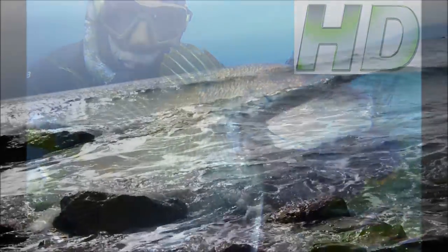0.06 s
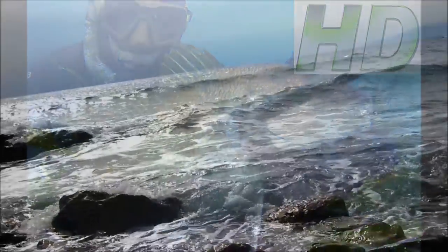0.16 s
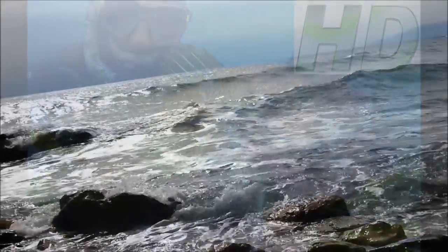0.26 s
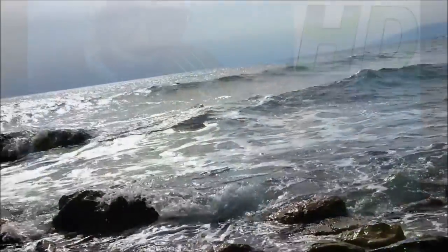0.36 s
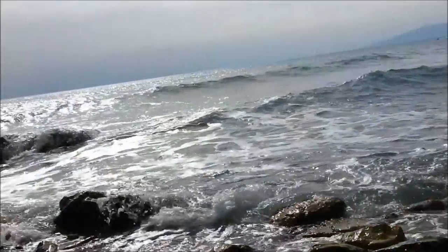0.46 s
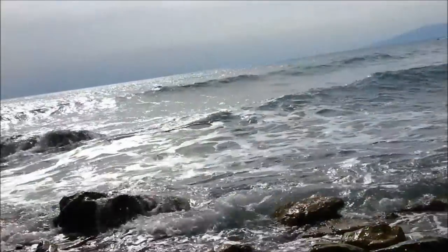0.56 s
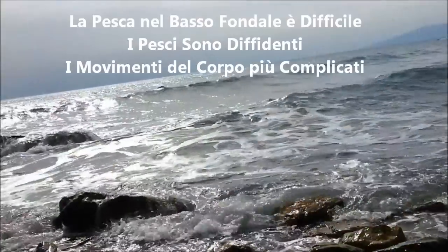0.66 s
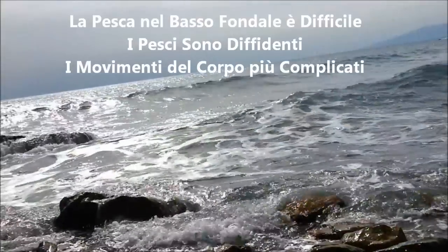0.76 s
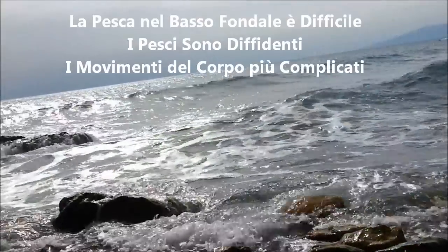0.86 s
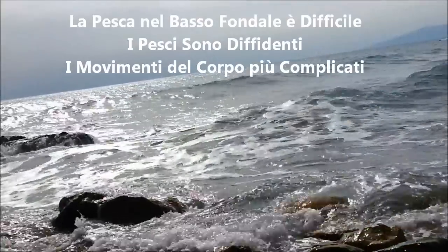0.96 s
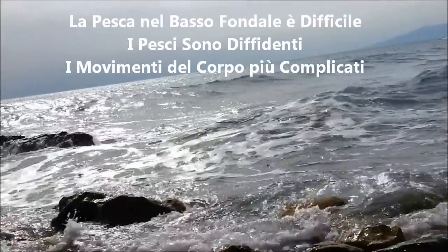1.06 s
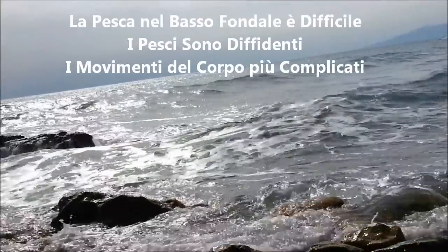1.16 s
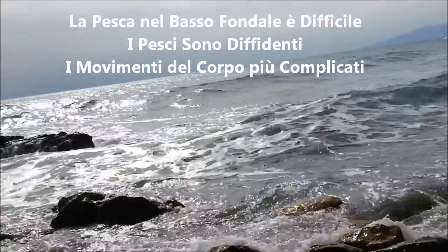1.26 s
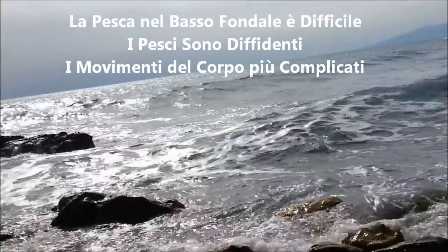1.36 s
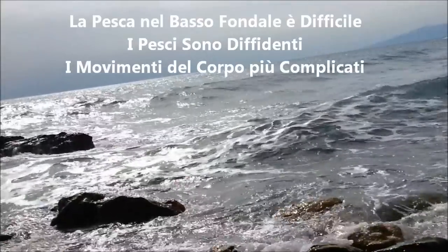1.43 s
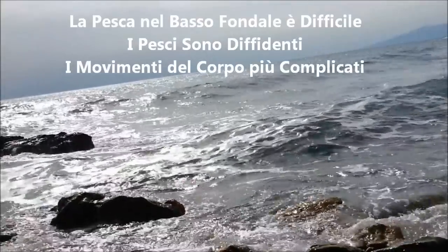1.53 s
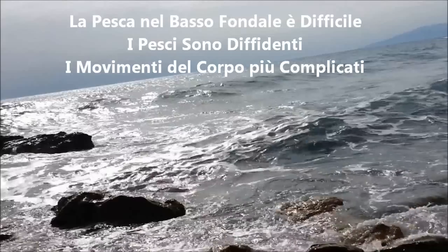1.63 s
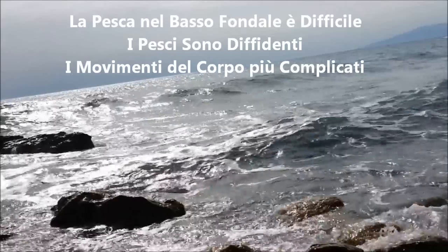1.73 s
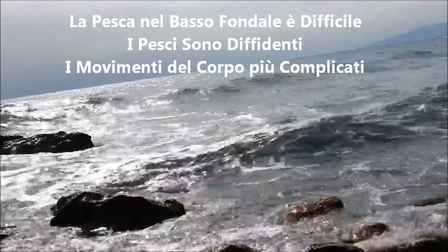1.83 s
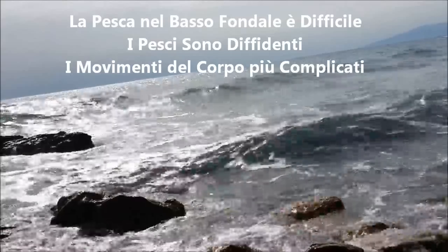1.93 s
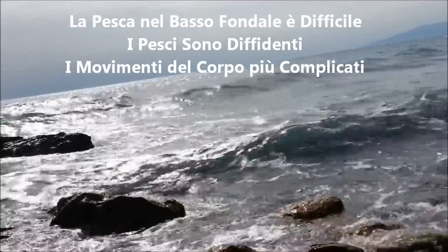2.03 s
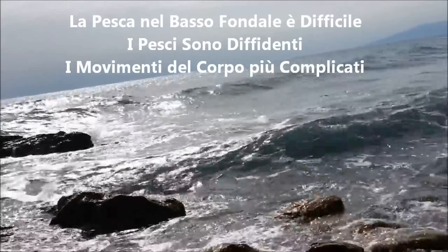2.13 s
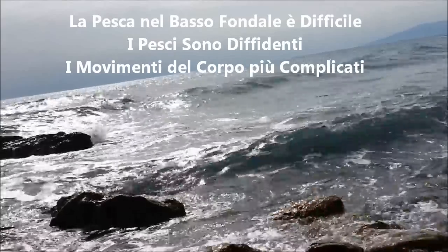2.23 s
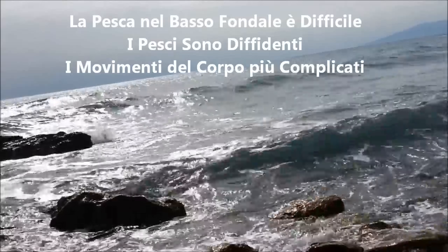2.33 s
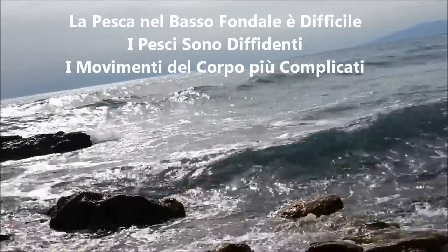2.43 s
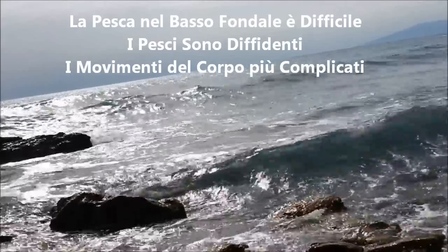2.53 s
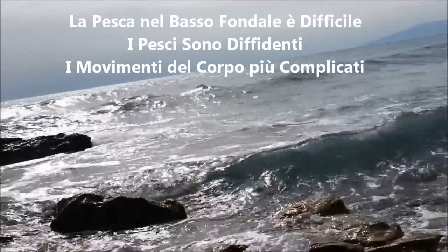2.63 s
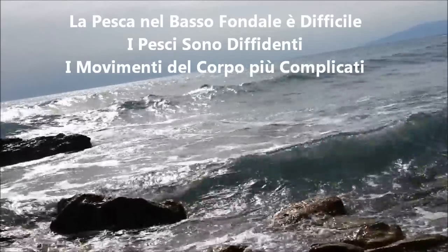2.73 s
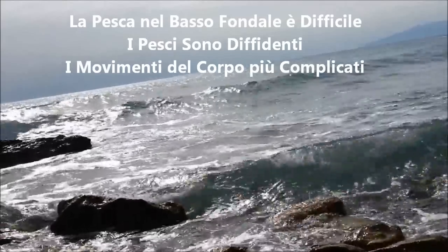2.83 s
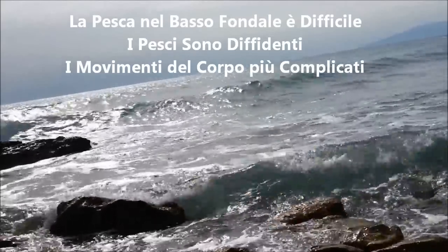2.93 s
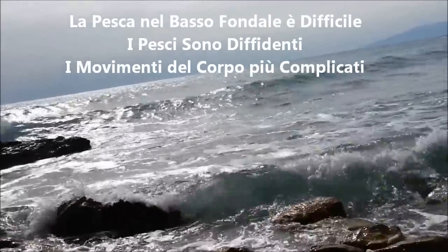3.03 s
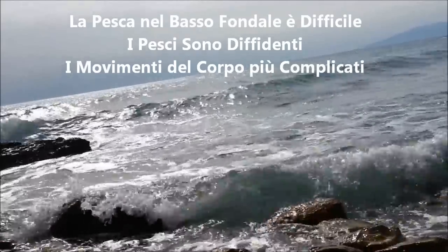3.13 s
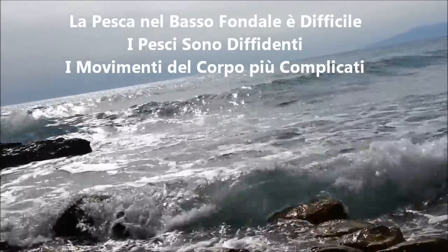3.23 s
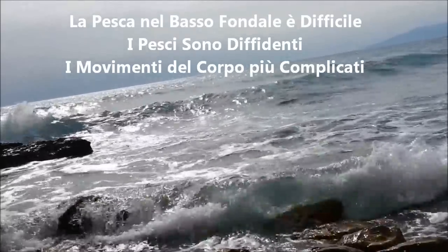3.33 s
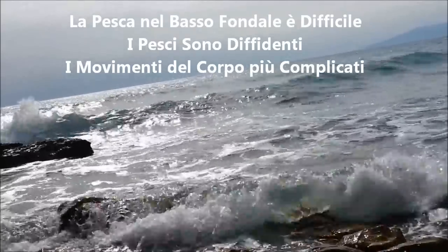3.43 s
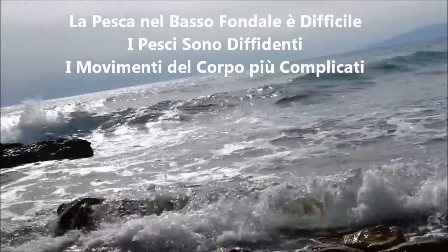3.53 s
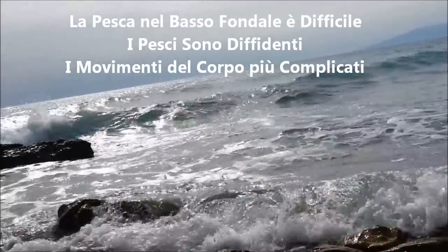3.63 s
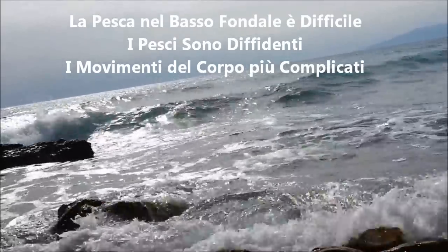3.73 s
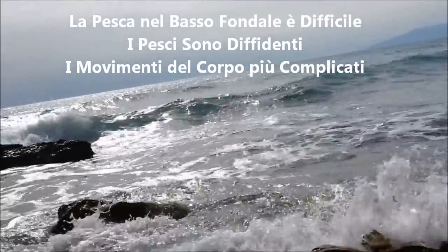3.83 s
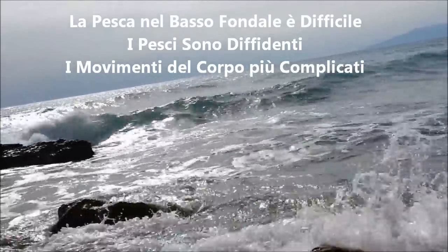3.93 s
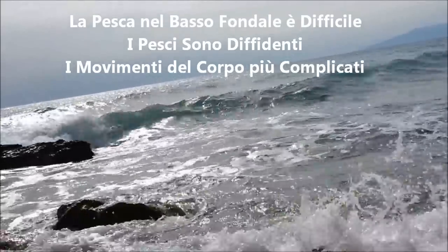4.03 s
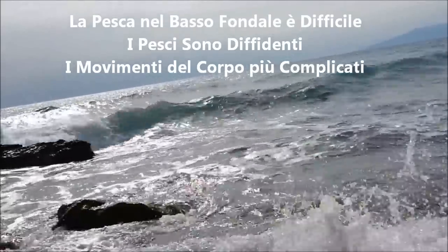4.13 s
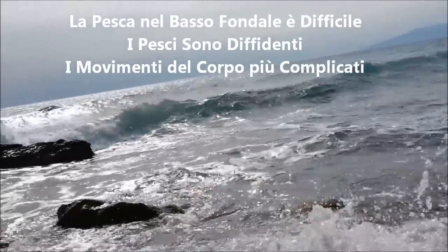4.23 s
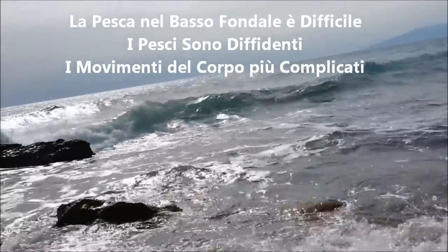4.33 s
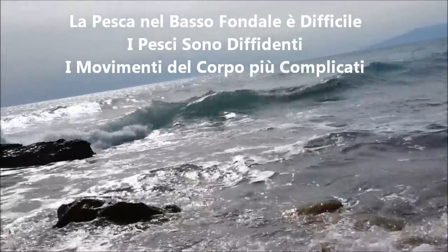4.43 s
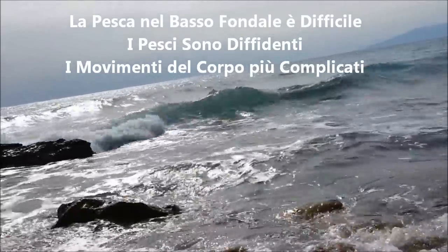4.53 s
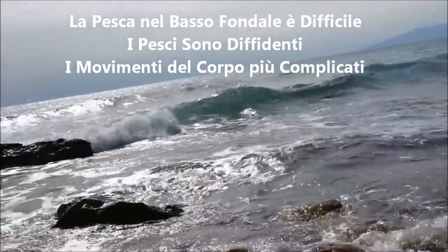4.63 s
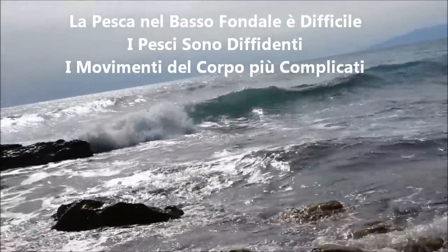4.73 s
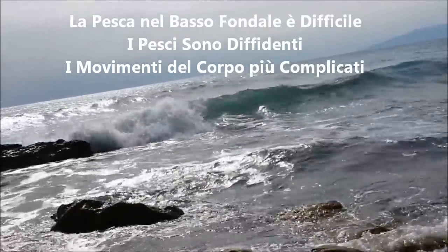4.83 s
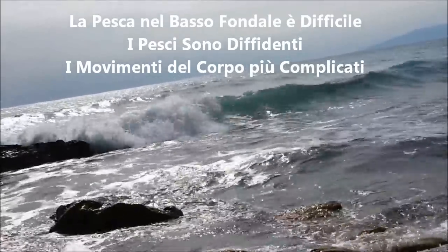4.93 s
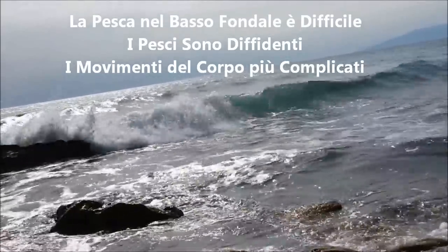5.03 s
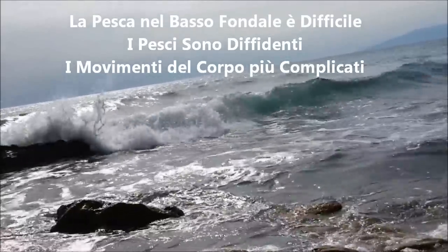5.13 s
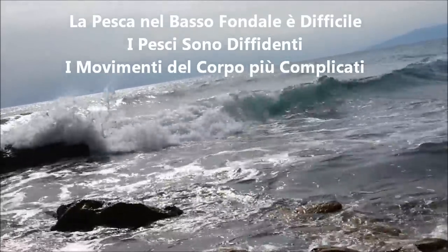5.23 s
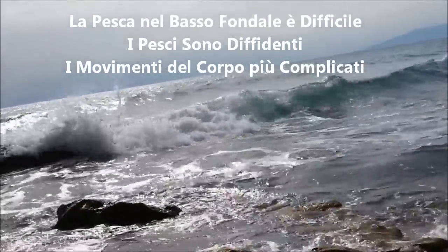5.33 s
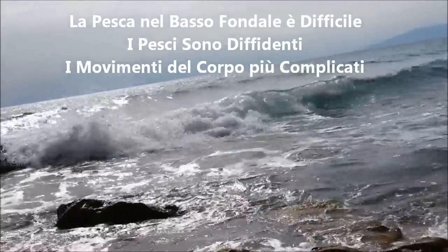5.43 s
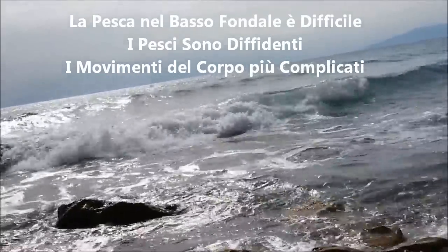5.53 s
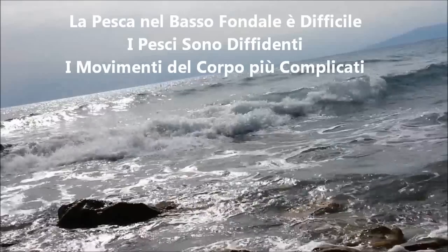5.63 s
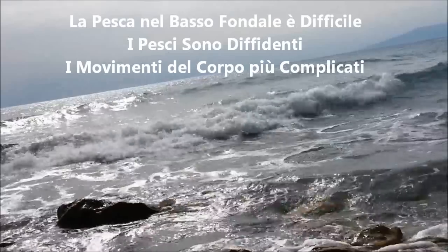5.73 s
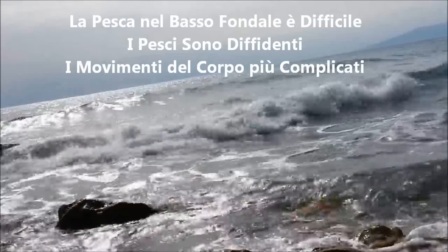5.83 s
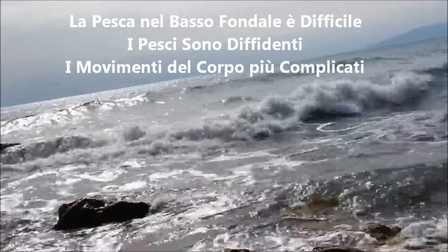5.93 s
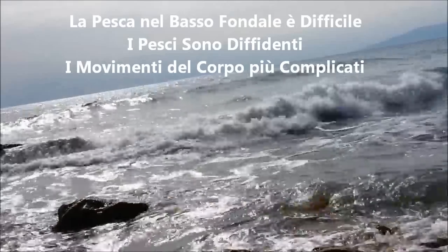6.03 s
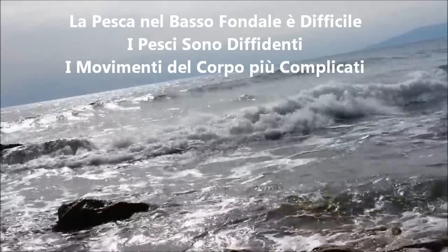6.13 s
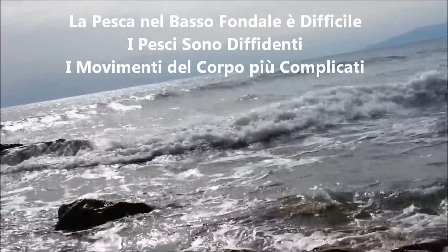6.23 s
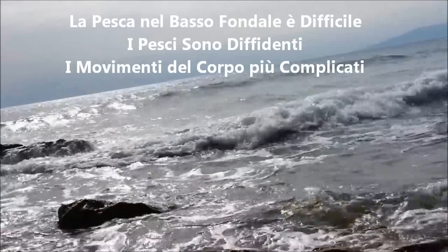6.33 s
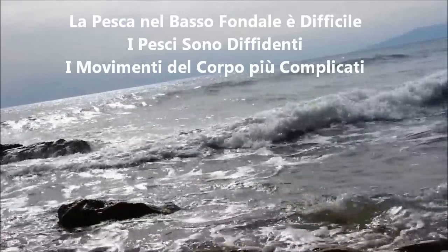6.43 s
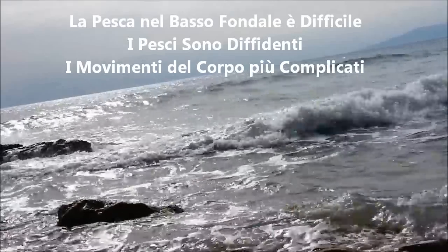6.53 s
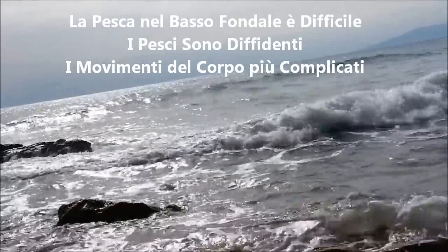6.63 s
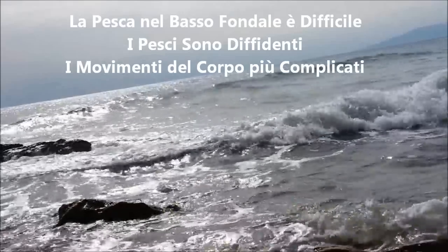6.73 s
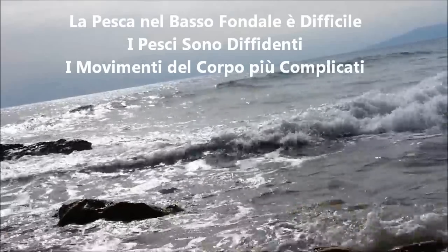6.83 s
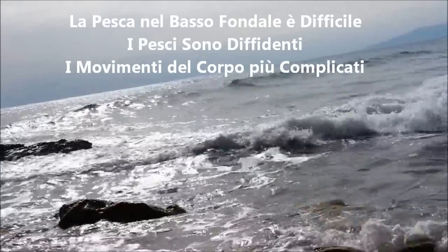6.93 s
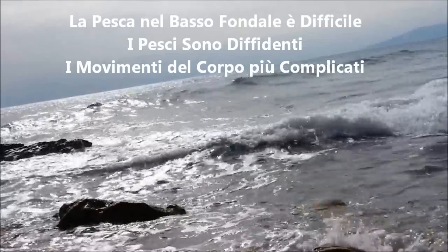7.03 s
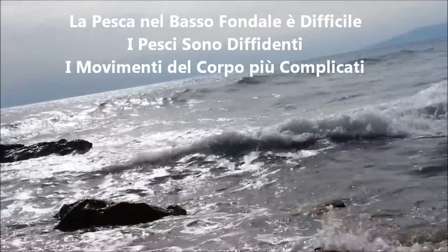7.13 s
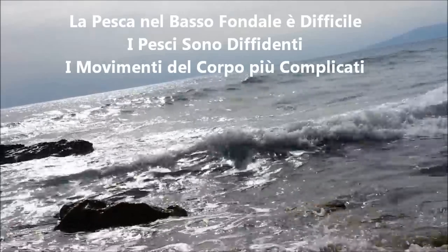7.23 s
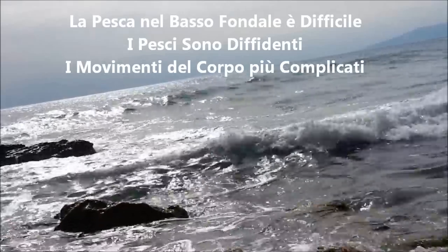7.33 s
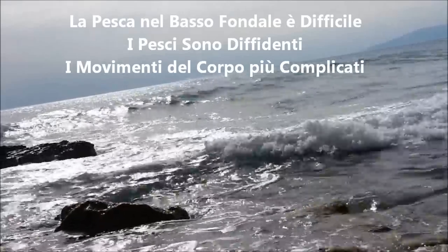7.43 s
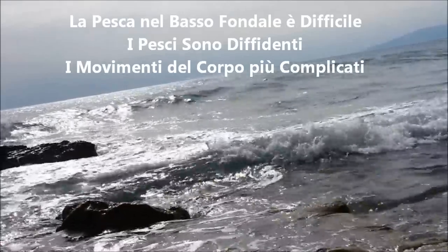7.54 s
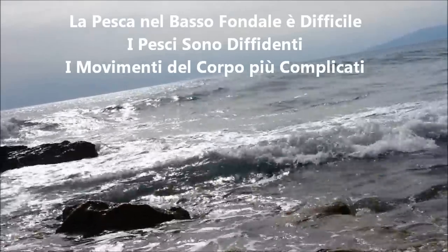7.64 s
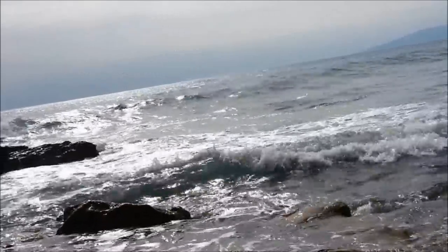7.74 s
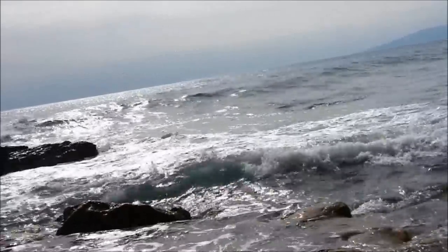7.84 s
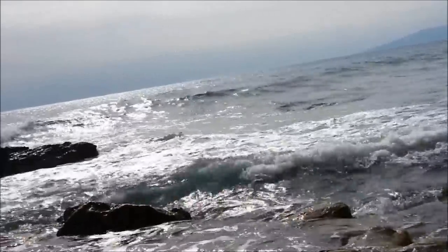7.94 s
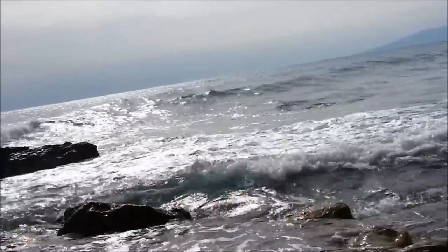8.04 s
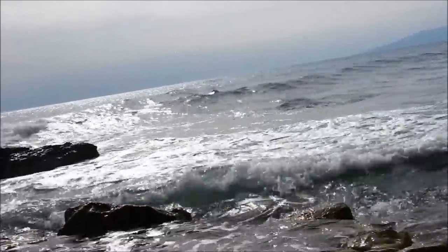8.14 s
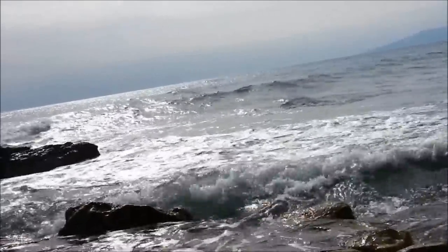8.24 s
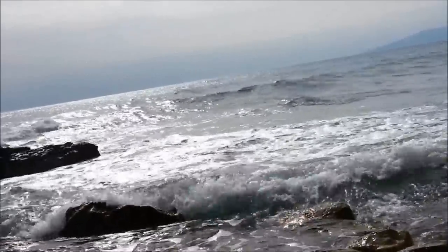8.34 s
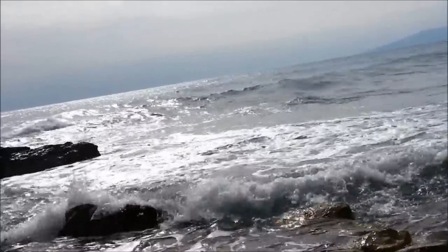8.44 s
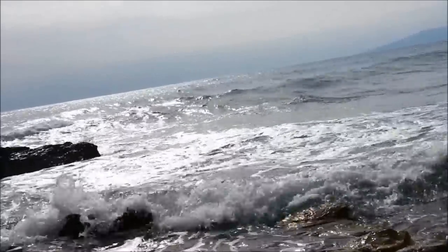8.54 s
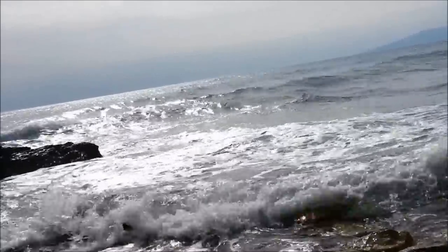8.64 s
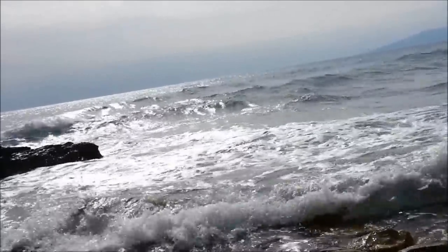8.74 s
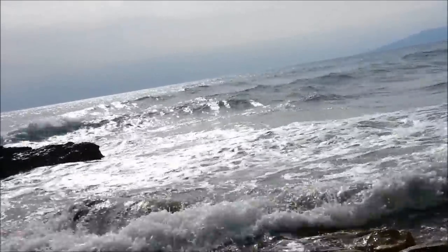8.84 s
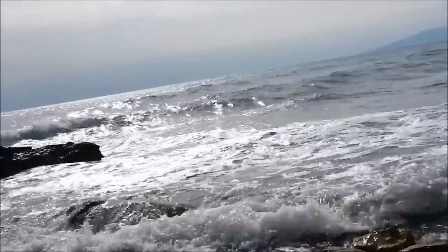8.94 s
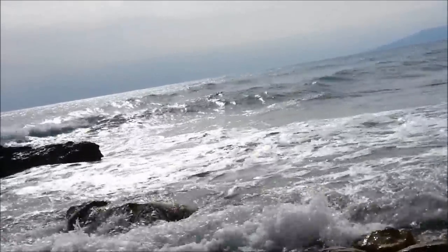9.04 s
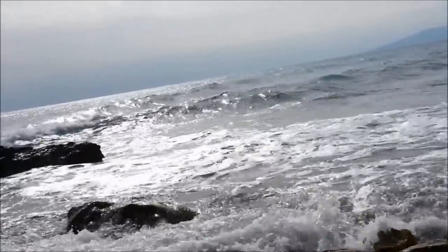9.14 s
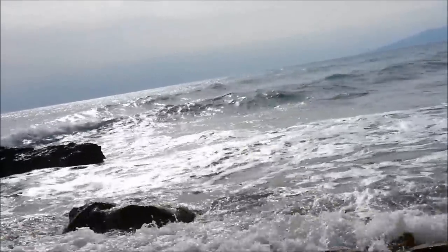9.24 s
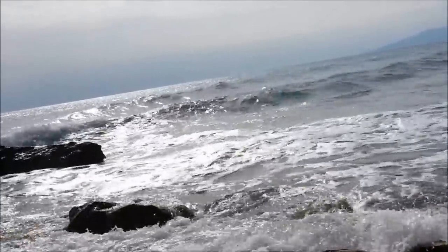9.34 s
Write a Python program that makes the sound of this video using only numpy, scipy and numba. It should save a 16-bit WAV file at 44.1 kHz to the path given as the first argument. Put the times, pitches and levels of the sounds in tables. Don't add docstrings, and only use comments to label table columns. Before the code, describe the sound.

Steady rough surf on a stony shore, heard close in stereo through a small built-in microphone. Crests pour and drain in uneven bursts, with watery slaps, fizzing spray and short rising bubble tones. A few tiny drops tick midway, then soft gusts flutter low at the left while the waves keep washing to the end.

```python
import sys
import numpy as np
from scipy import signal
from scipy.fft import rfft, irfft, dct, next_fast_len
from scipy.io import wavfile
from numba import njit

SR = 44100
rng = np.random.default_rng(int(sys.argv[2]) if len(sys.argv) > 2 else 0)


def to_linear_factor(level_db):
    exponent = np.asarray(level_db, float) / 20
    return 10 ** exponent


def transcribe(signal):
    frames = np.atleast_2d(signal).T
    limited = np.clip(frames, -1, 1)
    pcm = np.round(limited * 32767).astype(np.int16)
    wavfile.write(sys.argv[1], SR, pcm)


N = 413305
POCKET_RISE = 0.1


def rms_one(x):
    return x / np.sqrt(np.mean(x ** 2) + 1e-20)


def filtered(x, order, hz, kind):
    return signal.sosfilt(signal.butter(order, hz, kind, fs=SR, output="sos"), x)


def at_hz(points, hz):
    points_hz, values = np.transpose(points)
    return np.interp(np.log(hz), np.log(points_hz), values)


def in_time(rows):
    s, *columns = np.transpose(rows)
    return [np.interp(np.arange(N) / SR, s, column) for column in columns]


def drift(rate):
    r = np.exp(-80 * np.pi * rate / SR)
    slow = signal.lfilter([1], [1, -2 * r, r * r], rng.standard_normal(N // 40 + 2002))
    slow = rms_one(slow[2000:])
    return np.interp(np.arange(N) / 40, np.arange(len(slow)), slow)


def breakers(treble):
    # (time [s], level against the wash [dB], swelling time [s], pouring time [s], brightness [dB])
    crests = [(.606, -4, 0.032, 0, 2), (2.837, 7, 0.064, 0.07, 0), (3.18, 1.5, 0.023, 0.11, 4),
              (3.598, 2.3, 0.077, 0.004, -2.5), (3.993, -0.4, 0.034, 0.19, -3.5),
              (4.298, 0.6, 0.13, 0.054, 2), (4.485, 0, .044, 0.075, 1), (5.356, 5, 0.068, .11, 4.5),
              (5.618, 5.5, 0.033, .032, 0), (5.788, 3, 0.02, 0.087, -2), (5.948, 4.5, 0.066, 0, 1.5),
              (6.229, 2, 0.028, 0.083, -1), (6.51, 2.5, 0.015, 0, 0), (6.69, 1.5, 0.052, 0.039, -1),
              (8.408, -1, 0.055, .02, 0), (8.62, -.9, 0.027, 0.2, 2), (9.2, -5.5, 0.046, 0.029, 2)]
    # (time [s], level against the wash [dB], pouring time [s], brightness [dB])
    slaps = [(.886, 5, 0, 3), (2.486, 6, 0, 1.5), (3.439, -1, 0.042, 0), (3.55, 0, 0.017, 0),
             (3.81, -2.5, 0.13, -7), (4.852, 0, 0.026, -3), (5.286, 5, 0.0012, 5.5),
             (5.516, 5.5, 0.093, -2.5), (7.135, 2, 0.015, -1), (7.241, 2, 0, -5), (7.431, -3.5, 0.29, 0),
             (7.706, -1, .135, -0.5), (8.006, 0.8, 0.16, -0.5), (8.463, -1, 0, -1), (8.948, -2.5, .13, -3)]
    slap_s, drain_s = 0.006, 0.04
    t = np.arange(0, N + 32, 32) / SR
    power = np.ones(len(t))
    sudden = [(s, db, slap_s, pour, bright_db) for s, db, pour, bright_db in slaps]
    for s, db, swell, pour, bright_db in [*crests, *sudden]:
        rising = to_linear_factor(db + treble * bright_db) * np.clip((t - s) / swell, 0, 1)
        draining = np.exp(-np.maximum(t - s - swell - pour, 0) / drain_s)
        power = power + rising ** 2 * draining
    return np.interp(np.arange(N) / SR, t, 10 * np.log10(power))


def droplets(per_s, spread_db, share):
    hits = (rng.random((2, 2, N)) < per_s / SR) * rng.standard_normal((2, 2, N))
    hits = rms_one(hits * to_linear_factor(spread_db * drift(21)))
    return np.sqrt(1 - share) * rng.standard_normal((2, 2, N)) + np.sqrt(share) * hits


def foam(zone_db, lean_db, shared_db, near_db, own_db):
    zones_hz = [
        200,
        950,
        3500,
        9000,
        13500,
    ]
    # (frequency [Hz], likeness [0-1])
    likeness = [(40, .7), (200, .88), (800, .85), (1000, .6), (1200, .3), (2000, .12), (3000, .2),
                (5000, .12), (7000, .03)]
    white = droplets(per_s=2500, spread_db=2.5, share=0.12)
    edges = 22 * 2 ** np.arange(0, 10, 0.5)
    everywhere = 0.3 * drift(6.5) + 1.94 * drift(20.6)
    nearby = [drift(13.0) for _ in zones_hz]
    out = 0
    for k, (low, high) in enumerate(zip(edges, edges[1:])):
        mid, side = filtered(white[k % 2], 2, [low, high], "band")
        hz = np.sqrt(low * high)
        share = [np.interp(np.log(hz), np.log(zones_hz), row) for row in np.eye(len(zones_hz))]
        surge_db = shared_db * everywhere + near_db * np.dot(share, nearby) + own_db * drift(19.0)
        turn_db = np.dot(share, lean_db) * [[0.5], [-0.5]]
        gain = to_linear_factor(np.dot(share, zone_db) + surge_db + turn_db)
        alike = at_hz(likeness, hz)
        out = out + gain * (np.sqrt(1 + alike) * mid + np.sqrt(1 - alike) * side * [[1], [-1]])
    return out


@njit
def ring(out, start, size, hz, cycles, rise, sr):
    for k in range(len(start)):
        n = int(cycles[k] * sr / hz[k])
        for i in range(min(n, len(out) - start[k])):
            u = i / n
            phase = 2 * np.pi * cycles[k] * u * (1 + rise * u)
            out[start[k] + i] += size[k] * np.exp(-6.9 * u) * np.sin(phase)


def bubbles(rush_db, level_db, spread_db, cycles, rise, count=2500):
    when, pitch, size, length = rng.random((count, 4)).T
    start = (when * (N - 1)).astype(np.int64)
    sizes = to_linear_factor(rush_db[start] + level_db - spread_db * np.log(size + 0.0037))
    out = np.zeros(N)
    ring(out, start, sizes, 184.0 * to_linear_factor(22.0 * pitch), cycles * (0.5 + length), rise, SR)
    return out


def pockets(level_db):
    # (time [s], peak level [dB], pitch [Hz], length [cycles])
    big_pockets = [(0.146, -27, 517, 14), (0.204, -15, 670, 14), (0.899, -24, 437, 14),
                   (2.489, -11, 875, 16), (2.609, -17, 767, 14), (2.819, -13, 287, 15),
                   (2.899, -10, 821, 15), (2.948, -14, 299, 18), (3.679, -9, 453, 7.8),
                   (4.849, -18, 466, 10), (5.288, -5, 763, 14), (5.314, -8, 820, 14), (5.529, -12, 640, 14),
                   (6.523, -8, 780, 14), (6.735, -12, 1150, 14), (8.42, -8, 800, 10), (5.292, -13, 696, 12),
                   (7.29, -11, 960, 14), (7.38, -9, 865, 12), (7.242, -7, 463, 11), (7.258, -9, 450, 12),
                   (7.468, -4, 931, 17), (7.549, -6, 770, 12), (7.719, -8, 740, 14), (8.039, -14, 278, 18),
                   (8.464, -6, 705, 14), (8.669, -6, 918, 15)]
    s, db, hz, cycles = np.transpose(big_pockets)
    start = ((s + 0.002) * SR).astype(np.int64)
    out = np.zeros(N)
    ring(out, start, to_linear_factor(db + level_db), hz * 0.96, 2.7 * cycles, POCKET_RISE, SR)
    return out


def gurgles(pitch_spread, cycles, count=24):
    # (middle time [s], half length [s], level [dB], pitch [Hz])
    swarms = [(0.172, .03, -32, 1200), (1.32, 0.032, -33, 500), (2.52, 0.032, -29, 850),
              (2.939, 0.048, -24, 796), (3.68, 0.042, -25, 450), (4.149, 0.085, -25, 460),
              (5.30, .012, -24, 734), (5.601, 0.074, -25, 700), (6.748, 0.024, -27, 1350),
              (6.797, .015, -30, 2050), (7.3, .06, -26, 960), (7.55, .12, -23, 830),
              (8.07, .025, -27, 2200), (8.471, .015, -28, 1300), (8.75, 0.064, -27, 800)]
    s, half, db, hz = np.transpose(swarms)[:, :, None]
    when, pitch, size = rng.standard_normal((3, len(swarms), count))
    start = np.clip((s + half * when) * SR, 0, N - 1).astype(np.int64).ravel()
    sizes = to_linear_factor(db + 4.2 * size).ravel()
    pitches = (hz * np.exp(pitch_spread * pitch)).ravel()
    out = np.zeros(N)
    ring(out, start, sizes, pitches, np.full(start.size, cycles), POCKET_RISE, SR)
    return out


def drops(tick_s, low_hz):
    # (time [s], peak level [dB], left-right [dB])
    ticks = [
        (3.85, -44, -10),
        (4.045, -42, -8),
        (4.435, -32, -2),
        (5.225, -47, 8),
    ]
    t, out = np.arange(N) / SR, np.zeros((2, N))
    for s, db, pan_db in ticks:
        sides = to_linear_factor(db + pan_db * np.array([[0.5], [-0.5]]))
        out += sides * (t > s) * np.exp(-np.abs(t - s) / tick_s)
    return filtered(out * rng.standard_normal((2, N)), 2, low_hz, "high")


def wind(lumpy_db, leak_db, low_cut_hz):
    # (middle time [s], half width [s], level [dB], eddy pitch [Hz])
    gusts = [(5.40, 0.021, -28, 200), (5.808, 0.011, -18, 251), (5.86, 0.029, -21, 191),
             (6.00, 0.015, -21, 260), (6.07, 0.034, -24, 170), (6.266, 0.031, -20.5, 234),
             (6.306, 0.012, -24, 262), (6.325, 0.0063, -14.5, 330), (6.721, 0.037, -30.5, 151),
             (6.885, 0.03, -29.5, 200), (7.156, 0.0076, -12, 208), (7.30, 0.027, -23, 280),
             (7.389, 0.035, -24, 187), (7.483, 0.0093, -18.5, 190), (7.611, 0.013, -20, 330)]
    t, out = np.arange(N) / SR, np.zeros(N)
    for s, half, db, hz in gusts:
        span = slice(int((s - 3 * half - 0.02) * SR), int((s + 3 * half + 0.01) * SR))
        air = rng.standard_normal(len(t[span]))
        eddy = filtered(air, 1, [hz * 0.65, hz * 1.44], "band")
        eddy = filtered(eddy, 2, hz * 2.0, "low")
        swell = np.exp(-0.5 * ((t[span] - s) / half) ** 2)
        out[span] += to_linear_factor(db) * swell * rms_one(eddy)
    out = filtered(out * to_linear_factor(lumpy_db * drift(36)), 2, low_cut_hz, "high")
    return out * np.array([[1], [to_linear_factor(leak_db)]])


def breeze(level_db, peak_hz):
    # (time [s], level [dB])
    freshening = [(0, -70), (1.7, -77), (2.6, -71), (3.3, -65), (4.6, -61), (5.6, -54), (6.1, -55),
                  (7.1, -56), (8.4, -65), (9.37, -60)]
    (wind_db,) = in_time(freshening)
    flutter = filtered(rng.standard_normal((2, N)), 1, [peak_hz * 1.03, peak_hz * 1.46], "band")
    flutter = filtered(flutter, 2, peak_hz * 3.4, "low")
    return rms_one(flutter) * to_linear_factor(wind_db + level_db + np.array([[2.5], [-2.5]]))


def ports(x, left, right):
    # (frequency [Hz], phase by which left leads [rad])
    lead = [(30, 1.5), (120, 0.22), (700, 0.6), (1000, 1.24), (1700, 2.8), (2100, 3.42), (2500, 5.86),
            (3000, 5.2), (4000, 9), (5000, 9)]
    # (frequency [Hz], width [Hz], level [dB])
    housing = [
        (45, 140, -4.5),
        (200, 210, 1.5),
        (454, 91, 4),
    ]
    size = next_fast_len(N + 4096)
    hz = np.maximum(np.arange(size // 2 + 1) * SR / size, 1)
    earlier = np.exp(1j * at_hz(lead, hz))
    gain = np.array([to_linear_factor(at_hz(left, hz)) * earlier, to_linear_factor(at_hz(right, hz))])
    for peak_hz, width, db in housing:
        gain = gain * to_linear_factor(db / (1 + (2 * (hz - peak_hz) / width) ** 2))
    return irfft(rfft(x, size) * gain, size)[:, :N]


def scene():
    # (time [s], wash [dB], foaminess [dB], blown spray [dB],
    # weight of tumbling water [dB])
    wash_course = [(0, -32.5, -2, -2, -5.5), (.4, -32.5, -0.5, -0.5, -2.5), (.95, -30, 0, -0.5, -2),
                   (1.6, -32.5, .5, -.5, -2), (2.39, -35, 3, 0, 0), (2.7, -33, 0.5, 0, 1.5),
                   (3.14, -29.5, 0.5, 2, -1.3), (3.5, -24.5, 0.5, 1, 0), (4.3, -26.5, 3, 3.5, 1),
                   (4.69, -27, 1, -0.5, 2), (5.18, -29, -1.5, -3, .5), (5.9, -30, -1, -0.7, 0),
                   (6.5, -28.5, -2.1, -2, 0), (7.11, -31.5, -1, 1, -2), (7.3, -24.5, -2, -1.4, -3),
                   (8.2, -29, 0.5, .5, 1.5), (8.8, -26.5, 0.5, .5, 3), (9.37, -25.5, 0.8, 0.5, 1.5)]
    # (time [s], left-right of the spray [dB])
    swing = [(0.0, -2.5), (0.13, 0.5), (2.4, 0), (2.45, 0.5), (5.64, 1.5), (8.46, 1.5), (8.77, -2.5),
             (9.37, 2.5)]
    # (middle time [s], half width [s], level [dB])
    mist_clouds = [
        (1.2, .3, 3),
        (2.2, 0.071, 7),
        (4.42, 0.24, 5.5),
        (6.3, .15, 3.5),
    ]
    # (frequency [Hz], level [dB per Hz])
    left_port = [(25, -60), (63, -31), (110, -12.5), (190, -2.5), (330, -7), (460, -7), (850, -3.5),
                 (2100, -8), (3100, -13), (4300, -14), (6500, -29.5), (8500, -28.5), (10500, -36.5),
                 (14000, -40)]
    right_port = [(25, -65), (63, -27), (110, -10), (190, 0.5), (330, -3.5), (460, -4), (850, 0),
                  (2100, -6.5), (3100, -18.5), (4300, -21), (6500, -32), (8500, -29.5), (10500, -34.5),
                  (14000, -54)]
    # (frequency [Hz], level [dB])
    near_left = [(40, -16), (200, -7.5), (3000, -2.5)]
    near_right = [(40, -23), (200, -2.0), (3000, -4.5)]

    wash, foamy, blown, weight = in_time(wash_course)
    (heading,) = in_time(swing)
    heading = heading - np.mean(heading)
    t, still = np.arange(N) / SR, np.zeros(N)
    mist = sum(db * np.exp(-0.5 * ((t - s) / half) ** 2) for s, half, db in mist_clouds)

    lift, bright = breakers(treble=0), breakers(treble=0.76)
    depth = weight + 0.81 * lift
    splash = foamy + 0.79 * bright
    spray = blown + 0.83 * bright
    finest = 1.2 * blown + 0.6 * bright + mist
    zones = wash + np.array([depth, lift, splash, spray, finest])
    leans = np.array([still, still, -0.06 * heading, heading, heading])

    rush = to_linear_factor(13.0) * foam(zones, leans, shared_db=0.25, near_db=0.11, own_db=0.8)
    rings = bubbles(wash + lift, level_db=-5.5, spread_db=3.0, cycles=11.9, rise=0.065)
    rings = rings + pockets(level_db=-7.0) + gurgles(pitch_spread=0.181, cycles=18.0)
    water = ports(rush, left_port, right_port) + ports(np.array([rings, rings]), near_left, near_right)
    air = wind(lumpy_db=3.0, leak_db=-21, low_cut_hz=137) + breeze(level_db=6.0, peak_hz=75)
    return water + drops(tick_s=0.004, low_hz=9000) + air


def as_mid_side(pair, joint):
    return np.where(joint, np.array([pair[0] + pair[1], pair[0] - pair[1]]) / np.sqrt(2), pair)


def thin_treble(x, follow, scatter_db, rounding):
    # (frequency [Hz], step against the loudness of the frame [dB])
    coarseness = [(4000, -45), (4800, -21), (5800, -17), (7000, -16.5), (8500, -16), (9600, -15.5),
                  (11000, -15), (12500, -14), (14500, -12.5)]
    hop, grid = 1024, 663
    count, front = N // hop + 3, 2 * hop - grid
    window = np.sin(np.pi * (np.arange(2 * hop) + 0.5) / (2 * hop))
    padded = np.pad(x, ((0, 0), (front, (count + 1) * hop - N - front)))
    frames = np.stack([padded[:, k * hop:(k + 2) * hop] for k in range(count)], axis=1) * window
    a, b, c, d = np.split(frames, 4, axis=2)
    folded = np.concatenate([-c[..., ::-1] - d, a - b[..., ::-1]], axis=2)
    lines = dct(folded, type=4, norm="ortho")

    loud_db = 10 * np.log10(np.mean(lines ** 2, axis=(0, 2)) + 1e-12)[:, None]
    per_band = np.repeat(rng.standard_normal((count, hop // 32)), 32, axis=1)
    hz = (np.arange(hop) + 0.5) * SR / (2 * hop)
    step = to_linear_factor(at_hz(coarseness, hz) + follow * (loud_db + 25.5) - 26.5 + scatter_db * per_band)
    joint = np.repeat(rng.random((count, hop // 32)) < 0.5, 32, axis=1) & (hz < 9000)
    lines = as_mid_side(lines, joint)
    lines = np.sign(lines) * np.floor(np.abs(lines) / step + rounding) * step
    lines = as_mid_side(lines, joint)

    u, v = np.split(dct(lines, type=4, norm="ortho"), 2, axis=2)
    frames = np.concatenate([v, -v[..., ::-1], -u[..., ::-1], -u], axis=2) * window
    first = np.pad(frames[..., :hop], ((0, 0), (0, 1), (0, 0)))
    second = np.pad(frames[..., hop:], ((0, 0), (1, 0), (0, 0)))
    return (first + second).reshape(2, -1)[:, front:front + N]


def low_pass(x):
    return signal.sosfilt(signal.butter(12, 14540, fs=SR, output="sos"), x)


def record(dry):
    thinned = thin_treble(dry, follow=0.99, scatter_db=2.0, rounding=0.4)
    return low_pass(thinned)


dry = scene()
out = record(dry)
transcribe(out)
```